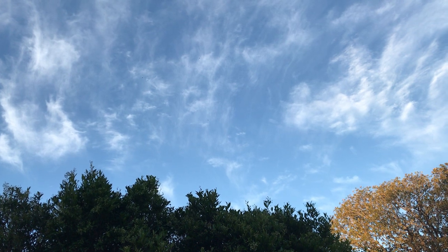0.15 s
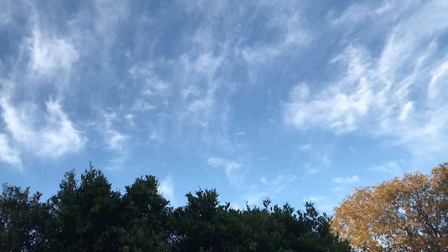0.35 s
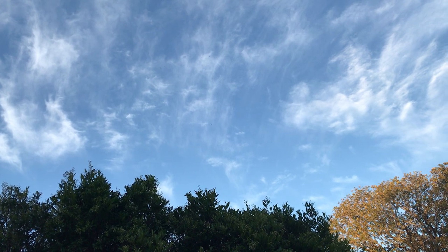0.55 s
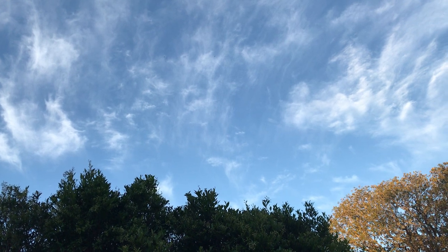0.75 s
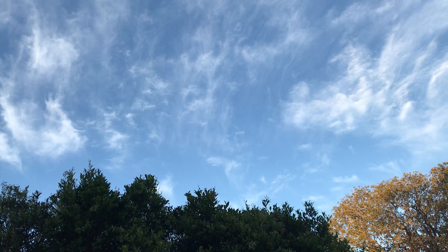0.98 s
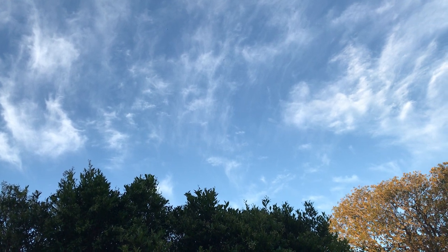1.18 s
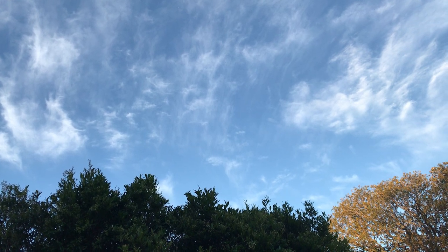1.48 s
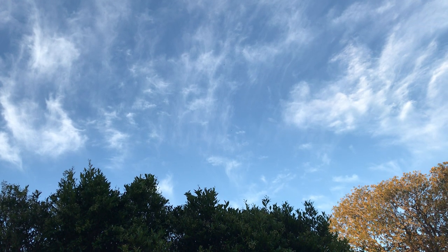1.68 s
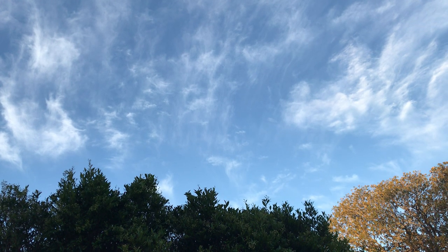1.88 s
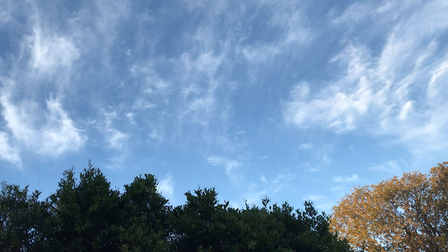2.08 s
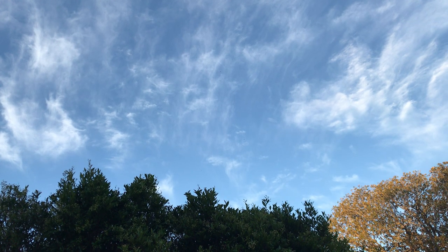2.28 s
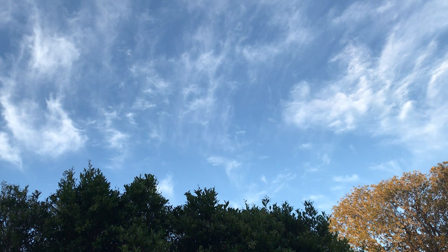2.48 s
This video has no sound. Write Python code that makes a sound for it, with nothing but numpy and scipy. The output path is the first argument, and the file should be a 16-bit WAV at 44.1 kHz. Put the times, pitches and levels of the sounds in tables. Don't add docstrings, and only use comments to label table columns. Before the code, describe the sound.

A magpie sings close by, starting with a clear whistle, then a wavering two-toned carol, low warble, deep purr and falling flutey end, over faint traffic rumble and leaf hiss, in open air among trees.

```python
import sys
import numpy as np
from scipy import signal
from scipy.fft import rfft, irfft, next_fast_len
from scipy.io import wavfile
from scipy.ndimage import map_coordinates

SR = 44100
rng = np.random.default_rng(int(sys.argv[2]) if len(sys.argv) > 2 else 0)


def waveform_to_disk(signal):
    frames = np.transpose(np.atleast_2d(signal))
    scaled = np.clip(frames, -1, 1) * 32767
    samples = np.round(scaled).astype(np.int16)
    wavfile.write(sys.argv[1], SR, samples)


def rack_gain(trim_db):
    fader = np.asarray(trim_db, float)
    return 10 ** (fader / 20)


N = 116865


def unit(x):
    return x / np.sqrt(np.mean(np.abs(x) ** 2) + 1e-20)


def along(points, hz):
    f, v = np.transpose(points)
    return np.interp(np.log(hz + 1), np.log(f + 1), v)


def wobble(rate, n):
    return map_coordinates(rng.standard_normal(int(n * rate / SR) + 4), [np.arange(n) * rate / SR])


def filtered(x, response):
    m = next_fast_len(N + SR // 2)
    return irfft(rfft(x, m) * response(np.fft.rfftfreq(m, 1 / SR)), m)[:N]


def bright_only(x):
    return filtered(x, lambda hz: hz ** 4 / (hz ** 4 + 8400.0 ** 4))


def turns(hz):
    return 2 * np.pi * np.cumsum(hz) / SR


def add(track, s, x):
    track[round(s * SR):][:len(x)] += x


def noise(spectrum):
    return unit(filtered(rng.standard_normal(N), lambda hz: rack_gain(along(spectrum, hz))))


# (frequency [Hz], level [dB per Hz])
TRAFFIC = [(12, -58.5), (20, -38), (43, -3), (83, 1.5), (312, -20.5), (403, -29.5), (600, -31.5),
           (780, -35.5), (1320, -120)]


def traffic():
    rumble = rack_gain(-49 + 0.8 * wobble(3.7, N)) * noise(TRAFFIC)
    drone_hz, width_hz = 84, 6
    hum = filtered(rng.standard_normal(N), lambda hz: 1 / (1 + ((hz - drone_hz) / width_hz) ** 2))
    return rumble + rack_gain(-57 + 1.3 * wobble(4.1, N)) * unit(hum)


# (frequency [Hz], level [dB per Hz])
LEAVES = [(400, -9), (1000, 1.5), (1600, -8), (5000, -21), (10300, -26), (15500, -23.5)]


def leaves():
    return rack_gain(-65.5 + 0.067 * wobble(0.83, N)) * noise(LEAVES)


# (time [s], level [dB])
TICKS = [
    (1.133, -57.5),
    (.295, -66),
    (.894, -68),
]


def twigs():
    out, t = np.zeros(N), np.arange(SR // 50) / SR
    for s, db in TICKS:
        add(out, s, rack_gain(db - 60 * t / 0.012) * rng.standard_normal(len(t)))
    return bright_only(out)


def trees(x):
    t60_s = 0.36
    t = np.arange(SR // 2) / SR
    tail = rng.standard_normal(len(t)) * rack_gain(-60 * t / t60_s) * (t > 0.01)
    return signal.fftconvolve(x, tail / np.linalg.norm(tail))[:N]


# (time [s], length [s], start pitch [Hz], end pitch [Hz], level [dB])
CHIRPS = [
    (1.085, 0.026, 2720, 2950, -63),
    (1.089, 0.05, 3700, 4520, -64),
    (1.125, .12, 4450, 4400, -75),
    (1.085, .04, 3100, 3400, -70),
    (1.615, .03, 5400, 6200, -76),
    (1.156, 0.044, 5300, 5800, -75),
    (1.905, .035, 2500, 3350, -61),
]


def small_bird():
    out = np.zeros(N)
    for s, length, start_hz, end_hz, db in CHIRPS:
        u = np.arange(0, length, 1 / SR) / length
        glide = start_hz + (end_hz - start_hz) * u ** 0.83
        phase = turns(glide * (1 + 0.02 * wobble(300, len(u))))
        octave = (start_hz < 3000) * rack_gain(-2.5) * np.sin(2 * phase)
        add(out, s, rack_gain(db) * np.sin(np.pi * u) * (np.sin(phase) + octave))
    return out


# (middle time [s], length [s], pitch [Hz], level [dB])
BREAKS = [(.2, 0.035, 1910, -62), (0.225, 0.045, 1724, -59), (0.232, .07, 3650, -66.5),
          (0.31, .05, 3920, -63), (0.952, 0.049, 2147, -56), (0.375, 0.046, 1700, -42.5),
          (0.434, 0.035, 1160, -48), (0.729, 0.012, 1024, -45.5), (0.809, 0.01, 886, -42),
          (1.091, 0.1105, 990, -62), (1.778, .24, 948, -61.5)]


def voice_breaks(tone):
    for s, length, hz, db in BREAKS:
        t = np.arange(0, length, 1 / SR)
        slip = np.sin(turns(hz * (1 + 0.0448 * wobble(100, len(t)))))
        add(tone, s - length / 2, rack_gain(db) * np.sin(np.pi * t / length) * slip)


# (time [s], half length [s], roughness [0-1])
RASPS = [
    (0.399, 0.035, 0.69),
    (0.743, 0.022, 0.48),
    (1.211, 0.0306, 0.2),
    (1.981, .06, 0.11),
]


def cracking(t):
    return sum(more * np.exp(-((t - at) / half) ** 2) for at, half, more in RASPS)


def overtones(size, effort, phase, hz, beak_hz, beak_db, tilt_db):
    k = np.arange(2, 13)[:, None]
    beak_width_hz = 360
    gain_db = tilt_db * (k - 2) + beak_db / (1 + ((k * hz - beak_hz) / beak_width_hz) ** 2)
    gain_db = gain_db + 2.5 * np.array([wobble(15, len(hz)) for _ in k])
    loudness = rack_gain(gain_db) * effort ** (0.089 + 0.12 * (k - 2))
    return size * np.sum(loudness * np.sin(k * phase + k * k) * (k * hz < 16000), 0)


# (frequency [Hz], gain [dB])
OVERTONE_COLOUR = [(3600, 1), (4700, 1.5), (5250, -17.5), (7300, -1), (8000, -16.5), (8900, -1), (10300, -22),
                   (11000, -18.5)]


def colour_overtones(x):
    return filtered(x, lambda hz: rack_gain(along(OVERTONE_COLOUR, hz)))


def two_sides(low, high, rough, cracks, beat, skirt):
    n = len(beat)
    rough_hz = 412
    rasp = (rough + cracks) * (wobble(rough_hz, n) + 1j * wobble(rough_hz, n))
    shape = 1 + low + high + 0.18 * (low ** 2 + high ** 2) + rasp
    return shape + skirt * sum(0.67 ** k * rack_gain(3 * wobble(30, n)) * beat ** (k + 2) for k in range(5))


# (time [s], pitch [Hz], level [dB])
WHISTLE = [(0.196, 1100, -73), (.21, 981, -48.5), (0.228, 1227, -43), (.285, 1250, -30), (0.325, 1189, -25),
           (0.354, 1246, -29.5), (0.372, 1239, -35.5), (0.399, 1176, -50.5), (0.421, 1167, -75)]
# (time [s], pitch [Hz], level [dB], beat [Hz], line below [dB], line above [dB])
CAROL = [(.375, 1457, -52, 296, -29, 5.5), (.405, 1516, -46.5, 300, 1.5, -12.5),
         (.44, 1640, -38.5, 256.7, -29, -26), (.495, 1567, -39, 219.1, -15.5, -21),
         (.55, 1533, -43.5, 201.7, -11.5, -13.5), (.63, 1512, -43.5, 150.7, -7, -12.5),
         (.685, 1463, -41, 135.2, -3, -1.5), (.712, 1358, -38.5, 81.3, 3.5, -18),
         (.728, 1424, -63, 69, 15.5, -32)]
# (time [s], pitch [Hz], level [dB])
TRILL = [(0.72, 1810, -64), (0.728, 1838, -41), (0.74, 1510, -49.5), (0.771, 1646, -51),
         (0.794, 1797, -46.5), (0.813, 1416, -48)]
# (time [s], pitch [Hz], level [dB], beat [Hz], line below [dB], line above [dB])
WARBLE = [(.805, 1292, -48.5, 80, -19.5, -41), (.82, 1231, -40, 83.6, -2, -2),
          (.845, 1176, -34.5, 81.8, -11.5, -5), (.88, 1138, -35.5, 94, -5, -5.5),
          (.925, 1129, -37.5, 77, -4.5, 2.5), (.955, 1075, -35, 71, -6, -4.5),
          (.972, 1000, -48, 69.2, -14, 2)]
# (time [s], pitch [Hz], level [dB], beat [Hz], line below [dB], line above [dB])
CROAK = [(.965, 998, -52.5, 362, -16, 9.5), (.98, 1064, -44, 408, -30, -4.5),
         (1.0, 1040, -45.5, 332, -32.5, -7.5), (1.04, 1062, -46, 364, -38, 0),
         (1.055, 1090, -68.5, 380, -25, -22)]
# (time [s], pitch [Hz], level [dB], beat [Hz], line below [dB], line above [dB])
PURR = [(1.18, 746, -55.5, 41.8, 4, 2), (1.22, 791, -53, 52, -5, 4), (1.245, 905, -50, 60.3, 8, 6),
        (1.285, 927, -39.5, 60.55, -1.5, -14.5), (1.36, 880.6, -35.5, 66.6, -3, -9.5),
        (1.46, 856.5, -29, 66.2, -11.5, -10.5), (1.51, 841, -33.5, 62.3, -9.5, -12),
        (1.61, 794, -39.5, 73.8, -1, 1), (1.632, 724, -72, 67.5, 3, -24)]
# (time [s], pitch [Hz], level [dB], beat [Hz], line below [dB], line above [dB])
HIGH_ROLL = [(1.64, 1764, -62, 44.54, 3.5, -1.5), (1.75, 1684, -50.5, 46.86, 2.5, 0),
             (1.87, 1737, -44, 46.45, -4, -12.5), (1.93, 1822, -41.5, 44, -16, -42),
             (1.97, 1700, -39.5, 45, -27, -33), (1.99, 1446, -45, 45, -25, -16),
             (2.002, 1450, -73, 45.3, -53, -41)]
# (time [s], pitch [Hz], level [dB])
LOW_ROLL = [(1.655, 1250, -65), (1.708, 1253, -50.5), (1.759, 1205, -48), (1.802, 1275, -48.5),
            (1.861, 1305, -44), (1.886, 1292, -43)]
# (time [s], pitch [Hz], level [dB], beat [Hz], line below [dB], line above [dB])
FALL = [(1.865, 1320, -47, 422, -20, -33), (1.885, 1270, -37, 427, -59, -40),
        (1.985, 1175, -31.5, 321.7, -39, -41), (2.0, 1150, -28.5, 276.6, -26.5, -17.5),
        (2.02, 1132, -30, 274.7, -24, -17), (2.04, 1150, -30.5, 139, -17, -10.5),
        (2.09, 1142, -34, 96.9, -12, -3), (2.2, 1067, -32.5, 96, -12.5, -1.5),
        (2.27, 993, -31, 99.9, -21, -6.5), (2.355, 1006, -35.5, 88.8, -9.5, -6.5),
        (2.385, 1010, -80, 98, -24, 11)]
# (note, flutter kind [turns: 0 level, 0.5 pitch], beat start [turns], overtones [dB],
# gain at the beak resonance [dB])
SONG = [
    ([r + (420, -55, -55) for r in WHISTLE], 0.46, 0.045, -26.5, 9.3),
    (CAROL, 0.22, 0.22, -22.5, 3.8),
    ([r + (55, -3, -3) for r in TRILL], 0.18, 0.025, -20.5, 1.72),
    (WARBLE, 0.51, 0.069, -29, 15),
    (CROAK, 0.11, 0.093, -21, 2.5),
    (PURR, 0.51, 0.049, -44.5, 27.3),
    (HIGH_ROLL, 0.17, 0.16, -12.5, 5.2),
    ([r + (45, -5, -5) for r in LOW_ROLL], 0.21, 0.53, -40, 4.8),
    (FALL, 0.22, 0.075, -24, 5.9),
]
ROUGH = (.015, .05, .35, .05, .05, .04, .12, .2, .025)
BEAK_HZ = (3650, 4650, 3500, 7300, 2450, 7000, 3550, 3600, 8800)
# (main [dB], lower side [dB], upper side [dB], pulsing with the flutter [0-1],
# blur [radians], tilt [dB per overtone], brightening over the note [dB])
OWN = [(-31, -90, -92, 0.16, .03, -0.5, 5.5), (-21.5, -23, -48, 0, 0.16, -0.82, 10.5),
       (-57, -93, -90, 0.9, .4, -5, -1.5), (-40, -92, -90, .6, 0.37, -2, 6),
       (-36.5, -90, -39, 0, .1, -2.5, -5), (-39.5, -92, -92.5, 1, 0.39, -4.5, 3),
       (-22.5, -94, -94, 1, 0.36, -6.5, 7), (-43, -90, -90, 1, 0.17, -1, -2),
       (-32, -38, -27.5, 0, 0.16, -2, -15.5)]
SKIRT = (0.001, 0.013, 0.051, 0.021, 0.001, 0.043, 0.13, 0.25, 0.013)


def magpie():
    flow, peak, bright, over = np.zeros((4, N), complex) + 1e-9
    for (rows, twist, start, over_db, beak_db), rough, beak_hz, own, skirt in zip(SONG, ROUGH, BEAK_HZ, OWN, SKIRT):
        s, *cols = np.transpose(rows)
        t = np.arange(s[0], s[-1], 1 / SR)
        n = len(t)
        hz, db, beat_hz, below_db, above_db = [np.interp(t, s, c) for c in cols]
        beat = np.exp(1j * (turns(beat_hz) + 2 * np.pi * start))
        low = rack_gain(below_db) * np.exp(2j * np.pi * twist) / beat
        high = rack_gain(above_db) * beat
        cracks = cracking(t)
        shape = two_sides(low, high, rough, cracks, beat, skirt)
        fade = np.clip(np.minimum(t - t[0], t[-1] - t) / 0.0011, 0, 1)
        size = rack_gain(db) * fade
        phase = turns(hz * (1 + 0.0028 * wobble(40.5, n)))
        add(flow, s[0], size * shape * np.exp(1j * phase))
        most = size * (1 + np.abs(low) + np.abs(high))
        add(peak, s[0], most)
        add(bright, s[0], most * rack_gain(over_db))

        main_db, low_db, high_db, pulsing, blur, tilt_db, swell_db = own
        swell = swell_db * np.linspace(-0.5, 0.5, n)
        sides = ((np.abs(shape), main_db, pulsing, hz),
                 (low, low_db, 0.44, hz - beat_hz),
                 (high, high_db, 0.44, hz + beat_hz))
        for side, side_db, grows, side_hz in sides:
            angle = phase + np.angle(side) + (blur + 0.77 * cracks) * wobble(412, n)
            side_size = size * rack_gain(side_db + swell) * np.abs(side) ** grows
            ladder = overtones(side_size, most / most.max(), angle, side_hz, beak_hz, beak_db, tilt_db)
            add(over, s[0], ladder)

    bright, opening, peak = (bright / peak).real, flow / peak, peak.real
    mixed = sum(rack_gain(-3 * (k - 1)) * (opening ** k).imag for k in range(2, 7))
    over = over.real + peak * bright * rack_gain(-0.5) * mixed
    breath = peak * bright * rack_gain(-22.5) * rng.standard_normal(N)
    over = over + peak * cracking(np.arange(N) / SR) * rack_gain(-15.5) * rng.standard_normal(N)
    tone = flow.imag.copy()
    voice_breaks(tone)
    return tone + bright_only(breath) + colour_overtones(over)


def scene():
    background = traffic() + leaves() + twigs()
    birds = magpie() + small_bird()
    return (birds + rack_gain(-24) * trees(birds) + background)[None]


def low_pass(x):
    return signal.sosfilt(signal.butter(12, 15640, fs=SR, output="sos"), x)


def record(dry):
    return low_pass(dry)


dry = scene()
out = record(dry)
waveform_to_disk(out)
```